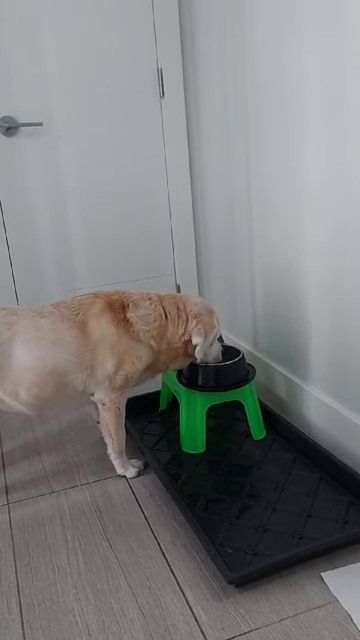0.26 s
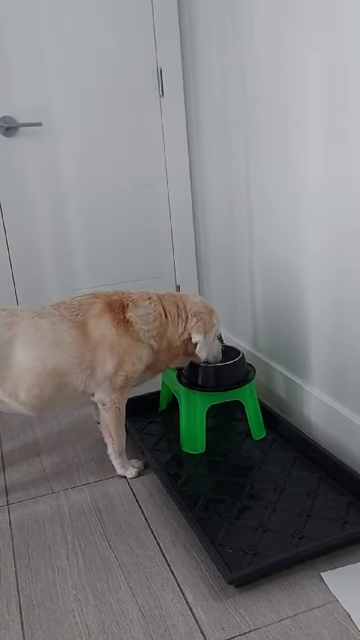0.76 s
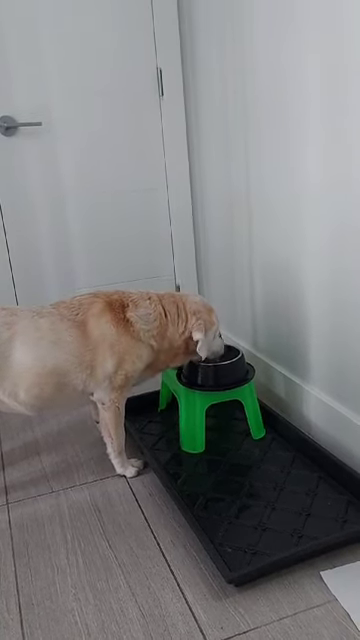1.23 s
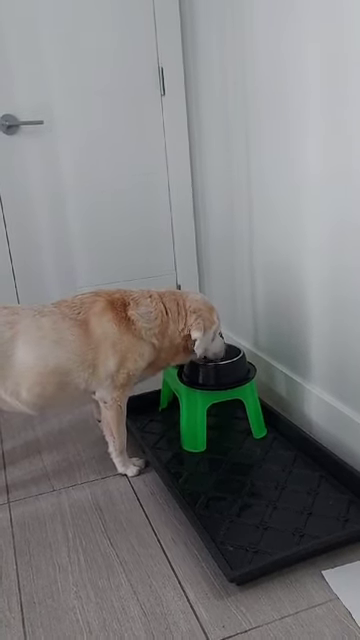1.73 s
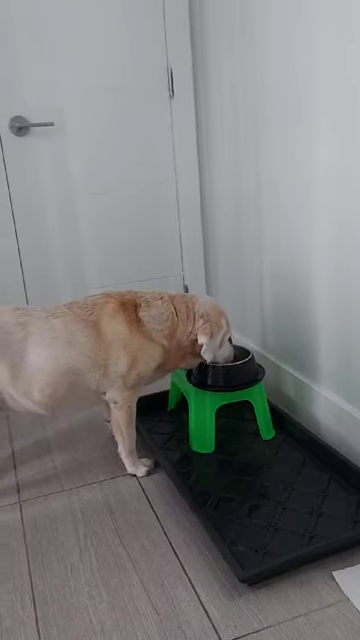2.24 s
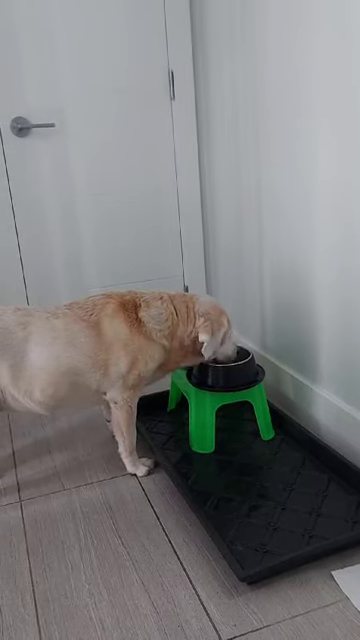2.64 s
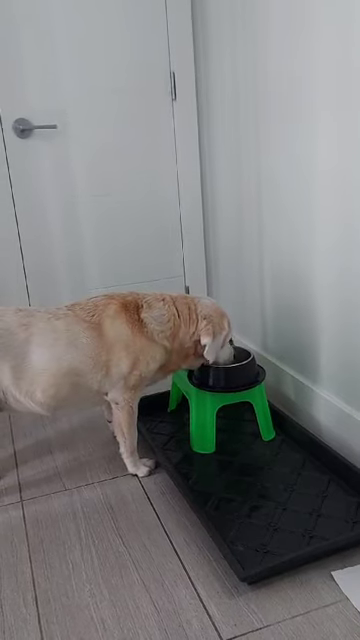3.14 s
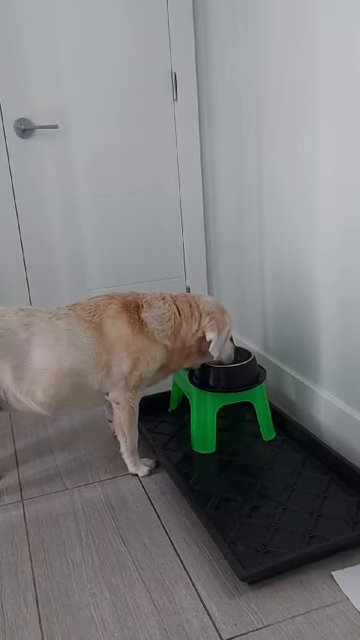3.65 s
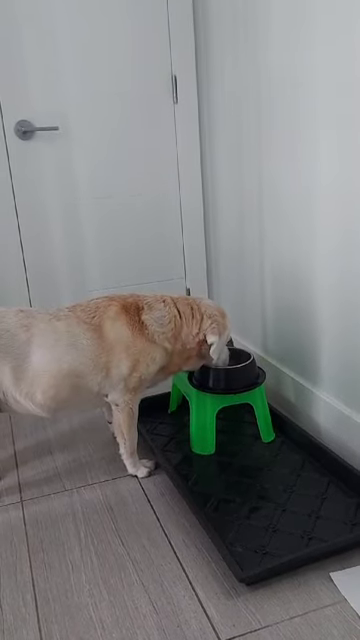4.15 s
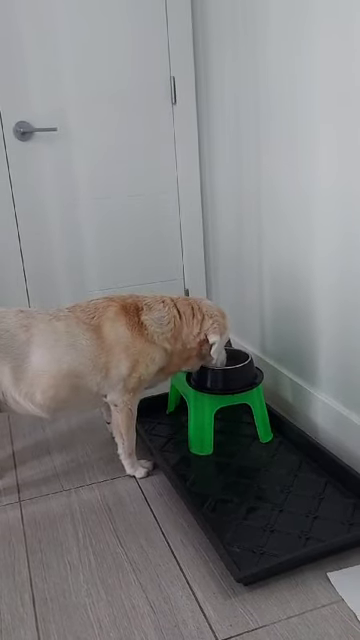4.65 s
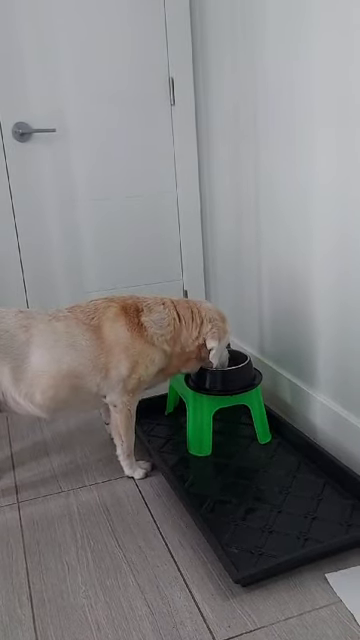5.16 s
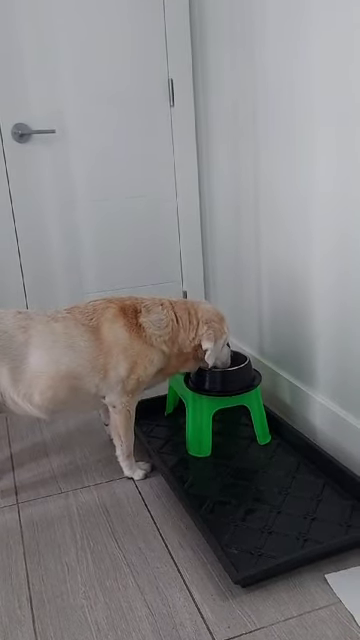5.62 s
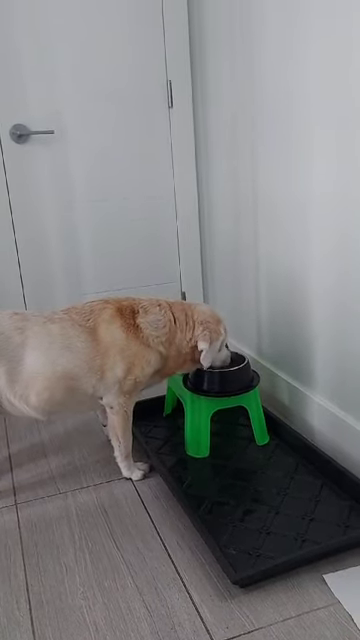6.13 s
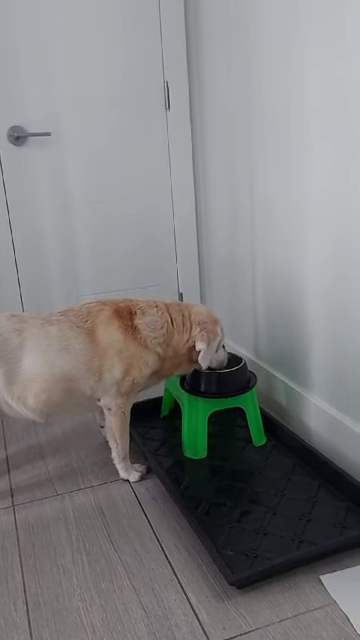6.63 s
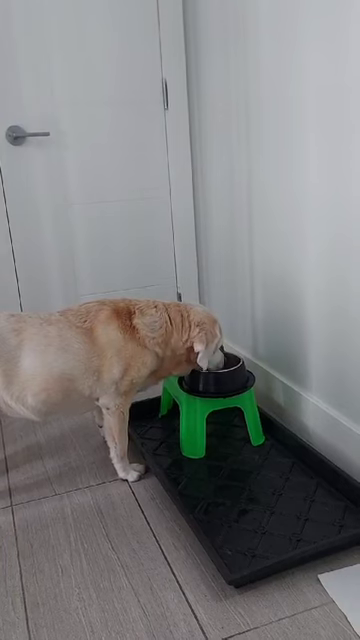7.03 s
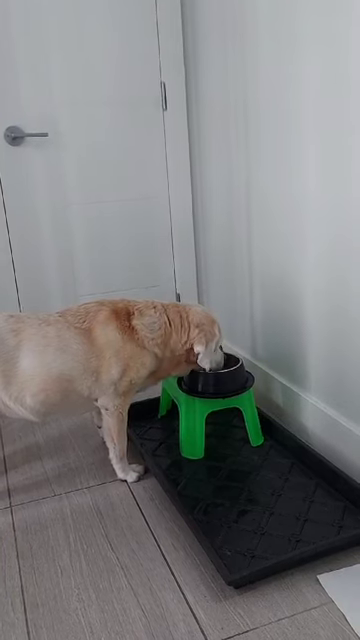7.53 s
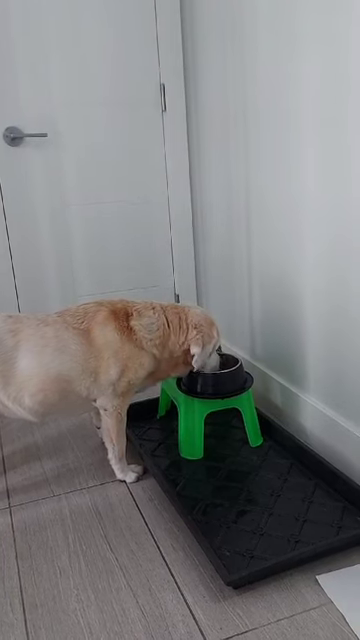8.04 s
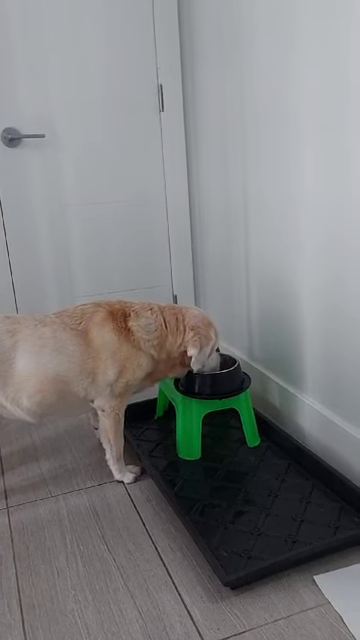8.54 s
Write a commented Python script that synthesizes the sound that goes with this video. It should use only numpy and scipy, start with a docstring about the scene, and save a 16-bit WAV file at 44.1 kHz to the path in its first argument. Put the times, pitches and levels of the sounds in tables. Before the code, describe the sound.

Close, wet lapping at an uneven but steady pace, heard in stereo with short wall echoes and a diffuse room tail. Rounded plops come first, followed by downward-gliding sloshes, spitting droplets and small smacks. The first laps are strongest; after a near pause with quiet licks, softer laps return and grow fuller towards the end. Tiny bubbles, faint metallic ringing, dull thuds and low bumps accompany them over very quiet air.

```python
"""Wet, quick lapping with plops, sloshes, crackling spray and mouth smacks, in a bare, echoing room.
A dog drinks from a steel bowl on a plastic stool in a corner. Plops are short tones of air pockets,
sloshes are random kicks ringing a cavity of gliding pitch, and sprays are bursts of coloured clicks.
Dull thuds, small bubbles, a faint ring of the bowl and a low rumble of the stool join in.
Wall echoes and a diffuse tail give the room; one faint tick and quiet air lie behind."""
import sys
import numpy as np
from scipy import signal
from scipy.fft import rfft, irfft, next_fast_len
from scipy.io import wavfile
from scipy.ndimage import uniform_filter1d

SR = 44100
rng = np.random.default_rng(int(sys.argv[2]) if len(sys.argv) > 2 else 0)


def generate_wav(sig):
    """Save sig (samples, or channels by samples) to the path in sys.argv[1] as 16-bit PCM at SR."""
    pcm = np.round(np.clip(np.atleast_2d(sig).T, -1, 1) * 32767).astype(np.int16)
    wavfile.write(sys.argv[1], SR, pcm)


N = 387197   # samples
TIME = np.arange(N) / SR   # seconds

# Laps: the tongue dips in, pulls water up, and the mouth closes. Levels are relative, before mixing:
# (time [s], pocket pitch [Hz], plop level [dB], dip slosh level [dB], dip spray level [dB],
#  dip squelch pitch [Hz], pull delay after the dip [s], pull slosh level [dB], pull spray level [dB],
#  pull squelch pitch [Hz], pull spray treble tilt [dB per octave], thud level [dB],
#  mouth closing delay after the dip [s], smack level [dB])
LAP_STROKES = [(.100, 1338, -22, -35.5, -52.5, 5030, 0.068, -39, -57.5, 4360, 7, -48.5, 0.075, -42),
               (.473, 1414, -25, -37, -47.5, 4140, 0.061, -36.5, -46, 4070, -2, -61, 0.17, -50),
               (.954, 1399, -33, -36, -53, 5250, .062, -44, -43, 6890, -7.5, -68, .178, -47),
               (1.330, 1103, -35, -36, -53.5, 2500, 0.062, -37, -38.5, 5460, -6, -58, 0.14, -51),
               (1.837, 1125, -33.5, -33.5, -55.5, 6200, 0.073, -41.5, -46, 5460, 3, -85, 0.092, -42),
               (2.208, 1502, -32.5, -44.5, -60, 8300, 0.058, -41, -55.5, 4260, -5.5, -61.5, 0.13, -45),
               (2.728, 1348, -32.5, -33, -47.5, 8050, 0.068, -40, -46.5, 7050, -10, -54, 0.081, -44.5),
               (3.114, 1349, -27, -35, -46, 5640, 0.06, -52, -53, 4380, -4, -63.5, 0.12, -50),
               (3.868, 1400, -41, -51, -54.5, 2540, 0.06, -50.5, -54.5, 6400, 4, -79, .003, -62),
               (4.912, 1355, -54, -48.5, -61.5, 4970, 0.063, -44, -51, 2710, -3, -56, 0.17, -53),
               (5.302, 1349, -43.5, -49, -57, 4800, 0.027, -43.5, -47.5, 4050, -5.5, -60, .168, -54),
               (5.742, 1391, -40, -49, -64, 4900, 0.091, -42, -50.5, 2900, -1.5, -70, 0.066, -50.5),
               (6.157, 1352, -35, -32.5, -53, 4650, .055, -40.5, -43.5, 3000, -2, -52, .170, -52),
               (6.668, 1490, -46, -47.5, -59.5, 7500, 0.042, -49.5, -45, 3390, -3.5, -56, 0.0028, -55),
               (7.028, 1171, -26.5, -33, -48.5, 7000, 0.052, -37, -44.5, 3600, -2, -51, .148, -57),
               (7.520, 1351, -27, -40, -48, 6670, 0.049, -43, -41.5, 11970, -5, -52.5, 0.15, -69),
               (7.906, 1061, -36.5, -36.5, -55, 3100, 0.047, -39.5, -40.5, 4520, 0.5, -52, .150, -64),
               (8.426, 1415, -38, -35, -49.5, 5890, 0.044, -45.5, -44.5, 3600, -1, -64, 0.15, -55.5)]


def from_db(db):
    """Turn decibels into a gain."""
    return 10 ** (np.asarray(db) / 20)


def rms_one(x):
    """Scale a sound to an average strength (rms) of 1."""
    return x / np.sqrt(np.mean(np.abs(x) ** 2) + 1e-20)


def at_hz(points, hz):
    """Read a table between its points, along a logarithmic frequency axis."""
    point_hz, value = np.transpose(points)
    return np.interp(np.log(np.maximum(hz, 1)), np.log(point_hz), value)


def coloured(x, spectrum, tilt_db=0):
    """Filter a sound by a spectrum, tilted by some dB per octave above 1 kHz; rms 1."""
    size = x.shape[-1]
    hz = np.arange(size // 2 + 1) * SR / size
    octaves = np.log2(np.maximum(hz / 1000, 1))
    gain = from_db(at_hz(spectrum, hz) + tilt_db * octaves)
    return rms_one(irfft(rfft(x) * gain, size))


def resonate(x, hz, q, gain_db):
    """Lift one resonance out of a sound."""
    peak = signal.iirpeak(min(hz, .4 * SR), q, fs=SR)
    return x + from_db(gain_db) * signal.lfilter(*peak, x)


def add(out, s, sound):
    """Mix a sound in at a time in seconds."""
    start = max(round(s * SR), 0)
    out[start:start + len(sound)] += sound[:N - start]


def grains(per_s, spread_db, size):
    """Random clicks of uneven strength and either sign."""
    born = rng.random(size) < per_s / SR
    weakness = np.minimum(rng.exponential(1, size), 4)
    return born * rng.choice([-1, 1], size) * from_db(spread_db * weakness)


def swell(t, attack, length, steepness):
    """A quick rise, then a fall."""
    return (1 - np.exp(-t / attack)) * np.exp(-(t / length) ** steepness)


def shaped(sound, shape, level_db):
    """Give a sound a rise and fall, with a level set by that shape."""
    return from_db(level_db) * rms_one(sound * shape) * np.sqrt(np.mean(shape ** 2))


def quiet_air():
    """Steady coloured noise, drawn separately for left and right."""
    # quiet air: (frequency [Hz], relative spectrum level [dB])
    air_colour = [(25, -19.5), (70, -8), (120, -14.5), (250, -15), (500, -23), (1300, -23), (2800, -33),
                  (4000, -30), (8000, -35.5), (13500, -25.5), (15500, -35.5)]
    noise = rng.standard_normal((2, next_fast_len(N)))
    return from_db(-74.5) * coloured(noise, air_colour)[:, :N]


def rumble(level_db=-5.5):
    """One low resonance of stool and floor swells and sways as the dog leans and laps."""
    # low resonance: (frequency [Hz], relative spectrum level [dB])
    rumble_colour = [(20, -27), (48, -19), (60, -11), (72, 6), (84, -10), (110, -25.5), (200, -33),
                     (500, -53)]
    # rumble strength over time: (time [s], relative level [dB])
    rumble_level = [(0, -72), (.3, -73), (.8, -60), (1.05, -73.5), (1.899, -71), (2.54, -58.5), (2.64, -67),
                    (2.801, -44), (2.919, -59.5), (3.42, -62.5), (3.702, -68.5), (4.79, -63), (5.75, -74.5),
                    (6.11, -54.5), (6.32, -46), (6.56, -66), (6.76, -47), (7.09, -59), (7.19, -47),
                    (7.43, -70.5), (7.68, -60.5), (8.25, -75), (8.5, -53.5), (8.78, -83)]
    sway_depth_db, sways_per_s = 3.4, 11
    s, db = np.transpose(rumble_level)
    boom = signal.hilbert(coloured(rng.standard_normal(next_fast_len(N)), rumble_colour))
    # even out the noise's own swells before applying the level curve
    even = boom.real / np.sqrt(uniform_filter1d(np.abs(boom) ** 2, SR // 10) / 2)
    turns = rng.standard_normal(size=200)
    sway_db = sway_depth_db * np.interp(TIME * sways_per_s, np.arange(len(turns)), turns)
    side_db = np.array([[-1.3], [1.3]])   # left, right
    return even[:N] * from_db(np.interp(TIME, s, db) + sway_db + level_db + side_db)


def tick(s=5.636, level_db=-44):
    """One faint, dry tick: a short noise burst, brightened by taking differences."""
    out, t = np.zeros(N), TIME[:SR // 100]
    burst = rng.standard_normal(len(t)) * np.exp(-t / 0.0017)
    add(out, s, from_db(level_db) * np.diff(burst) / 2)
    return out


def room(x, alike_hz=300, build_up=0.00057):
    """Diffuse tail: decay depends on frequency, and only the bass is alike on both sides."""
    # room decay: (frequency [Hz], time to fall by 60 dB [s])
    room_decay = [(100, 0.4), (400, 0.51), (1000, 0.54), (3000, 0.45), (7000, 0.43), (15000, 0.28)]
    t, tail = TIME[:SR * 2 // 3], 0
    hz = np.arange(len(t) // 2 + 1) * SR / len(t)
    mid, side = rfft(rng.standard_normal((2, len(t))))
    alike = 1 / (1 + (hz / alike_hz) ** 2)
    noise = np.sqrt(1 + alike) * mid + np.sqrt(1 - alike) * side * [[1], [-1]]
    edges = np.geomspace(40, 18000, 11)
    for low, high in zip(edges, edges[1:]):
        decay = from_db(-60 * t / at_hz(room_decay, np.sqrt(low * high)))
        band = irfft(noise * ((hz >= low) & (hz < high)), len(t))
        band = band * decay * (1 - np.exp(-(t / build_up) ** 2))
        energy = np.sum(band ** 2, axis=1, keepdims=True)
        tail = tail + band * np.sqrt(2 * (high - low) / SR / energy)
    return signal.oaconvolve(np.array([x, x]), tail, axes=1)[:, :N]


def moving_room(x, sway_s=1.4, count=3):
    """As the head moves, the sound fades round a few sets of reflections, once every sway."""
    place = count * TIME / sway_s
    shares = [np.maximum(1 - np.abs((place - k) % count - 1), 0) for k in range(count)]
    return sum(room(x * np.sqrt(share)) for share in shares)


def corner(x):
    """Direct sound with the first echoes off the corner walls and floor."""
    # first echoes: (left delay [s], right delay [s], gain [ratio])
    wall_echoes = [(.0043, 0.0052, 0.49), (.0073, 0.0061, 0.35), (0.0095, 0.023, 0.18)]
    out = np.array([x, x])
    for left, right, gain in wall_echoes:
        add(out[0], left, gain * x)
        add(out[1], right, gain * x)
    return out


def thuds(table):
    """Loose lips, swallows and falling water give dull noise bumps, each with a hollow pitch."""
    # dull bumps: (frequency [Hz], relative spectrum level [dB])
    thud_colour = [(40, -17), (75, -26), (120, -7.5), (230, 1), (350, -2.5), (550, 3.5), (900, -9),
                   (2000, -26.5)]
    out, t = np.zeros(N), TIME[:SR // 3]
    for s, db, length, hz in table:
        noise = coloured(rng.standard_normal(len(t)), thud_colour)
        flutter = resonate(noise, hz, q=3.5, gain_db=9)
        shape = swell(t, attack=0.0022, length=length, steepness=1.93)
        add(out, s, shaped(flutter, shape, db))
    return out


def bowl_ring(drive):
    """The splashing sets the steel ringing faintly, damped by the water."""
    # bowl resonances: (frequency [Hz], relative level [dB], time to fall by 60 dB [s])
    bowl_modes = [(1880, -53, .2), (3020, -47, 0.1), (4278, -4, 0.018), (5565, -47, 0.085),
                  (8150, -24.5, 0.041), (11270, -23.5, 0.12)]
    out = np.zeros(N)
    for hz, db, t60 in bowl_modes:
        r = from_db(-60 / (t60 * SR))   # what is left of the ring after one sample
        w = 2 * np.pi * hz / SR
        ring = signal.lfilter([1, 0, -1], [1, -2 * r * np.cos(w), r * r], drive + 1e-12)
        out += from_db(db - 8.5) * rms_one(ring)
    return out * np.std(drive)


def bowl_air(water):
    """The air in the bowl above the water colours the sloshes, keeping their strength."""
    # air in the bowl: (frequency [Hz], relative spectrum level [dB])
    air_resonance = [(150, -5), (400, -2.5), (560, -1.5), (720, 4), (850, 5.5), (1100, 0), (1600, 6.5),
                     (2300, 10.5), (3500, 0.5)]
    padded = np.pad(water, (0, next_fast_len(N) - N))
    return np.std(water) * coloured(padded, air_resonance)[:N]


def bubbles(table, level_db=8.5, cycles=3.9, rise=0.011, low_hz=1600, high_hz=13000, count=7):
    """Every spray leaves a few tiny bubbles that ping upward in pitch."""
    out, t = np.zeros(N), TIME[:SR // 30]
    for s, db, length, *_ in table:
        for late, size, strength in rng.random((count, 3)):
            turns = t * low_hz * (high_hz / low_hz) ** size
            rising = 1 + rise * np.minimum(turns, 3 * cycles) / 2
            ping = swell(turns, 1, cycles, 0.51) * np.sin(2 * np.pi * turns * rising)
            ping_db = db + level_db - 1.6 * strength - 12.0 * late
            add(out, s + 1.8 * length * late, from_db(ping_db) * ping)
    return out


def sprays(table, per_s=330, level_db=-3.0, count=3):
    """Films and droplets burst in spurts, coloured by the narrow gap between tongue and lips."""
    # droplets: (frequency [Hz], relative spectrum level [dB])
    spray_colour = [(60, -43), (400, -40), (1000, 3.5), (2000, 1), (2700, -3.5), (4200, -2.5), (5000, -2.5),
                    (6200, -1.5), (7800, 0), (9300, -8.5), (11500, 1), (15500, -4)]
    out, t = np.zeros(N), TIME[:SR // 7]
    for s, db, length, tilt_db, hz in table:
        crackle = 0
        for k, size in enumerate(rng.random(count)):
            window = 1 / (1 + (t / length * count / 2 - k) ** 4)
            spurt = grains(per_s, spread_db=4.0, size=len(t)) * window
            spurt_hz = hz * 2 ** (size - .5)   # up to half an octave either way
            crackle = crackle + rms_one(resonate(spurt + 1e-18, spurt_hz, q=4, gain_db=2))
        crackle = resonate(coloured(crackle, spray_colour, tilt_db), hz, q=3.5, gain_db=3)
        shape = swell(t, attack=0.0041, length=length, steepness=2.07)
        add(out, s, shaped(crackle, shape, db + level_db))
    return out


def sloshes(table, width_hz, glide, per_s, level_db, attack):
    """Small collapses excite a cavity whose pitch glides: down as it deepens, up as it closes."""
    out, t = np.zeros(N), TIME[:SR // 4]
    cavity = signal.butter(2, width_hz / 2, fs=SR, output="sos")
    for s, db, hz, length in table:
        random_phase = np.exp(2j * np.pi * rng.random(len(t)))
        kicks = grains(per_s, spread_db=0.5, size=len(t)) * random_phase
        pitch = hz * glide ** (1 - np.exp(-t / length))
        # filter around zero, then shift up to the gliding pitch
        carrier = np.exp(2j * np.pi * np.cumsum(pitch) / SR)
        ringing = (signal.sosfilt(cavity, kicks + 1e-18) * carrier).real
        shape = swell(t, attack, length, steepness=2.1)
        add(out, s, shaped(ringing, shape, db + level_db))
    return out


def plops(table, rise_cycles=1.823, sharpness=1.94, chirp=0.0015):
    """An open air pocket rings for a few cycles, rising in pitch as it closes."""
    out, t = np.zeros(N), TIME[:SR // 40]
    for s, db, hz in table:
        cycles = hz * t
        age = cycles / rise_cycles
        shape = (age * np.exp(1 - age)) ** sharpness
        phase = 2 * np.pi * cycles * (1 + chirp * (cycles / 2 - rise_cycles))
        add(out, s - rise_cycles / hz, from_db(db) * shape * np.sin(phase))   # strongest at s
    return out


def drops(count=4):
    """A few drops fall from the tongue after each pull, with levels tied to its slosh."""
    low_hz, high_hz = 654, 2600
    rows = []
    for s, _, _, _, _, _, pull_s, pull_db, *_ in LAP_STROKES:
        for late, size, strength in rng.random((count, 3)):
            drop_s = s + pull_s + .02 + .13 * late
            drop_db = pull_db - 0.5 - 11.5 * (strength + late) / 2
            rows += [(drop_s, drop_db, low_hz * (high_hz / low_hz) ** size)]
    return rows


def strokes():
    """Unfold the drinking into rows for plops, sloshes, smacks, sprays and thuds."""
    # air pockets bursting between strokes: (time [s], relative level [dB], pitch [Hz])
    loose_plops = [(.210, -32.5, 1010), (.874, -48.5, 1420), (1.018, -27, 1054), (1.136, -33.5, 1360),
                   (1.313, -43, 1500), (1.904, -28, 1090), (2.02, -34.5, 1560), (2.279, -28, 1180),
                   (2.433, -39, 1510), (2.897, -39, 1270), (3.103, -39, 1450), (3.829, -48, 1457),
                   (4.983, -41.5, 1280), (5.254, -48, 1370), (5.808, -40, 1470), (5.833, -21, 1215),
                   (6.225, -26.5, 970), (6.684, -35, 1230), (6.723, -34, 1330), (7.183, -32.5, 1330),
                   (7.443, -52.5, 1600), (7.703, -42.5, 1650), (8.061, -35.5, 1280), (8.493, -28.5, 1270)]
    # further dull thuds, swallows and glugs among them: (time [s], relative level [dB], length [s], pitch [Hz])
    more_thuds = [(0.663, -56.5, 0.054, 460), (0.698, -60, 0.04, 159), (1.59, -64, 0.073, 197),
                  (2.835, -58, 0.037, 330), (3.38, -63.5, 0.033, 157), (3.402, -58, 0.023, 470),
                  (4.976, -47, 0.061, 302), (5.343, -53.5, 0.057, 346), (6.28, -58.5, 0.036, 125),
                  (8.711, -65, 0.048, 430)]
    # licks of the lips: (time [s], relative level [dB], pitch [Hz], length [s],
    #  relative spray level [dB], squelch pitch [Hz])
    licks = [(3.991, -59.5, 821, 0.065, -59.5, 4170), (4.202, -57.5, 1520, .032, -70, 4130),
             (4.403, -66, 1054, 0.046, -72, 3160)]
    # water dribbling from the lips into the bowl: (time [s], relative level [dB], length [s],
    #  treble tilt [dB per octave], resonance [Hz])
    dribbles = [(0.275, -51, 0.014, -2.5, 3450), (1.131, -49.5, .019, -3.5, 3270),
                (2.325, -48, 0.037, -8.5, 13170), (3.223, -49.5, 0.025, -9, 4500),
                (5.967, -56.5, 0.01, -1, 5070), (7.32, -69, 0.027, 8, 9870)]
    pops, water, mouth, spray, bumps = [], [], [], [], []
    for (s, hz, plop_db, dip_db, dip_spray_db, dip_hz, pull_s, pull_db, pull_spray_db, pull_hz,
         tilt_db, thud_db, close_s, smack_db) in LAP_STROKES:
        dip = s - .003   # the water stirs just before the plop
        pull, close = s + pull_s, s + close_s
        deep_hz = 1027.7 * (hz / 1356) ** 0.606   # the deepened pocket; 1356 Hz is a usual pitch
        # the tongue slides out, dips and pulls
        water += [(max(s - .075, 0), -66, 1616, 0.0516),
                  (dip, dip_db, hz * 0.96, .068),
                  (pull, pull_db, deep_hz, .09)]
        # the tongue tip touches first, with a smaller, higher plop
        pops += [(s - 0.0072, plop_db - 16.5, hz * 1.08), (s, plop_db, hz)]
        mouth += [(close, smack_db, hz, .031)]
        spray += [(dip, dip_spray_db, 0.064, -2.5, dip_hz),
                  (pull + .002, pull_spray_db, 0.038, tilt_db, pull_hz),
                  (close, smack_db - 4, 0.015, -10.5, 2800)]
        bumps += [(s, thud_db - 11, 0.12, 310), (pull + .047, thud_db, .028, 236)]
    for s, db, hz, length, spray_db, squelch_hz in licks:
        water += [(s, db, hz, length)]
        spray += [(s, spray_db, length, -5, squelch_hz)]   # treble tilt -5 dB per octave
    return pops + loose_plops, water, mouth, spray + dribbles, bumps + more_thuds


def scene():
    """The lapping in its room, over rumble, a tick and quiet air."""
    plop_rows, slosh_rows, smack_rows, spray_rows, thud_rows = strokes()
    pops = plops(plop_rows) + plops(drops(), rise_cycles=2.614, sharpness=1.16, chirp=0.011)
    water = sloshes(slosh_rows, width_hz=590, glide=.68, per_s=260, level_db=-6.0, attack=0.0013)
    water = bowl_air(water) + thuds(thud_rows)
    mouth = sloshes(smack_rows, width_hz=300, glide=1.7, per_s=1500, level_db=-4.0, attack=0.0048)
    spray = sprays(spray_rows)
    spray = spray + bubbles(spray_rows) + bowl_ring(spray)
    near = corner(from_db(-0.5) * pops + from_db(-4.0) * water
                  + from_db(4.5) * mouth + from_db(-1.0) * spray)
    far = moving_room(from_db(0.5) * pops + from_db(1.0) * water
                      + from_db(2.0) * mouth + from_db(7.0) * spray)
    return near + far + tick() + rumble() + quiet_air()


def record(dry):
    """Cut the treble steeply above 15850 Hz."""
    return signal.sosfilt(signal.ellip(10, .2, 70, 15850, fs=SR, output="sos"), dry)


dry = scene()
out = record(dry)
generate_wav(out)
```